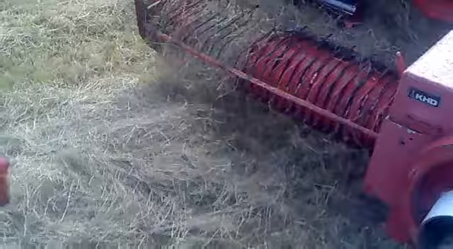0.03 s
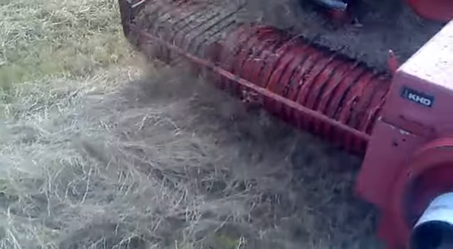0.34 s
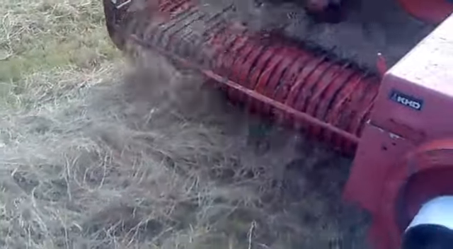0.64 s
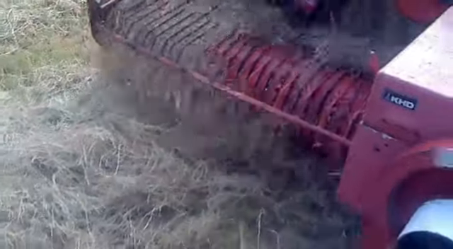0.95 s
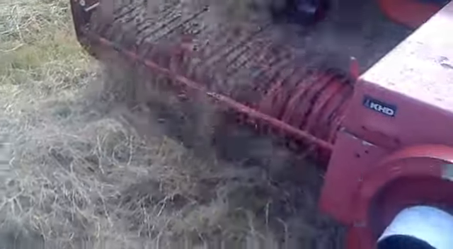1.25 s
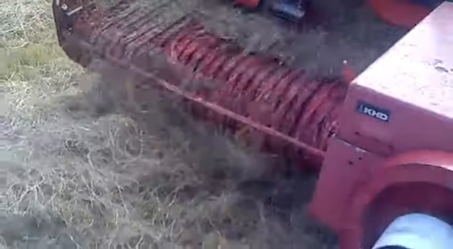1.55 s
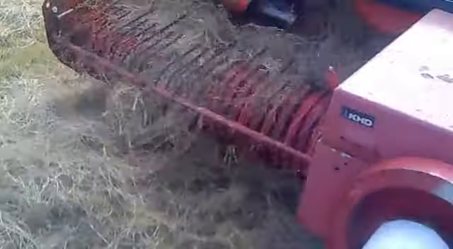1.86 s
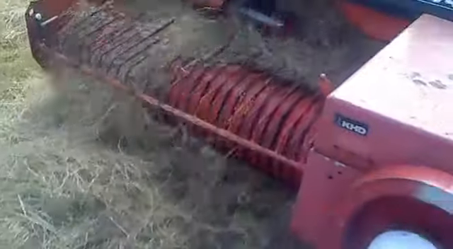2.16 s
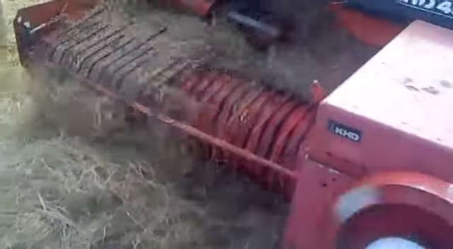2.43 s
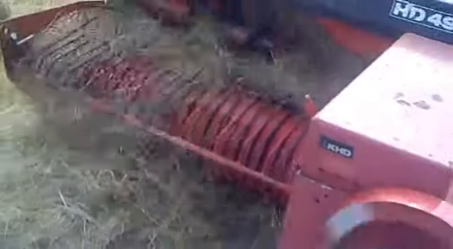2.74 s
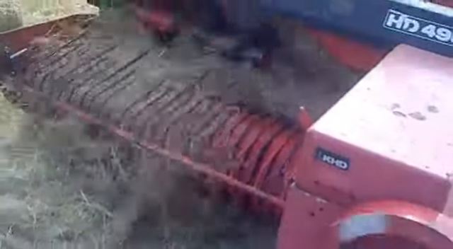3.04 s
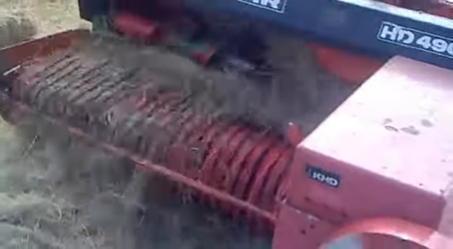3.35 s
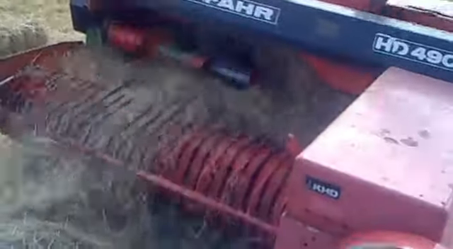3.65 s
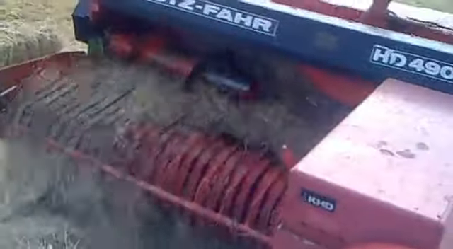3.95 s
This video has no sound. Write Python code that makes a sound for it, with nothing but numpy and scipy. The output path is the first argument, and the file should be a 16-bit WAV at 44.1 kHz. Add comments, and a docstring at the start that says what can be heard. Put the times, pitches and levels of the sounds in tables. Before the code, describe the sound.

Loud metallic rattling of a working hay baler, with regular booming strokes over an engine drone.

```python
"""Tractor and hay baler, beside the pickup reel.

The engine drones and a panel hums; chains and spring tines clatter and ring on sheet metal.
Each plunger stroke swells the clatter and booms in the bale chamber. Loose parts clank;
dry hay rustles over the reel and crunches in the feeder. The sound cuts in after one short blip."""
import sys
import numpy as np
from scipy import signal
from scipy.fft import rfft, irfft
from scipy.io import wavfile
from scipy.ndimage import uniform_filter1d

SR = 44100
rng = np.random.default_rng(int(sys.argv[2]) if len(sys.argv) > 2 else 0)


def pcm_store(signal):
    """Save signal as 16-bit PCM."""
    levels = np.round(np.clip(np.atleast_2d(signal), -1, 1) * 32767)
    wavfile.write(sys.argv[1], SR, levels.astype(np.int16).T)


N = 176400

# exhaust orders: multiple, level_db
ENGINE_ORDERS = [(1, -15), (2, 4), (3, -5), (3.5, -7)]
# plunger strokes: peak_s, clatter_db, boom_db
PLUNGER_STROKES = [(0.386, -2, 0.5), (1.118, -3, -5), (1.8, -4, 0.5), (2.46, -4.5, -5), (3.14, -3, -1.5),
                   (3.82, -3, -4)]
# bale chamber resonances: pitch_hz, width_hz, level_db
CHAMBER_MODES = [(117.4, 27, -1.5), (164.5, 17.4, -1.5), (220.6, 88, -2), (291.4, 43, 3.5), (327, 40, -3.5),
                 (381.9, 18, -1.5), (438, 59, -0.5), (539.3, 67, -0.5)]
# heavy thuds in the chamber: start_s, level_db
CHAMBER_THUDS = [(.315, -1), (.385, 0), (.45, 0), (1.034, 2), (1.141, 3.5), (1.295, 2), (1.832, -2),
                 (2.045, 0.5), (2.39, -5), (3.123, 1), (3.155, -0.5), (3.33, -2), (3.755, 1), (3.828, 3.5),
                 (3.905, 1)]
# hollow knocks of the chamber wall: start_s, pitch_hz, level_db
WALL_KNOCKS = [(1.139, 324, -25), (1.754, 300, -24.5), (2.04, 270, -33), (2.095, 276, -29.5),
               (2.765, 296, -34), (3.14, 418.6, -26.5), (3.421, 300.4, -28.5), (3.755, 268, -27)]
# panel hum swelling under load: start_s, hold_s, pitch_hz, level_db
PANEL_SWELLS = [(0.306, 0.13, 122, -39), (1.017, 0.21, 104.8, -33), (1.817, 0.13, 118, -33),
                (1.98, .05, 100, -28), (2.28, 0.094, 100.3, -34), (3.03, 0.055, 113.5, -32),
                (3.088, 0.055, 94.2, -31), (3.825, 0.077, 96.3, -39)]
# sheet metal spectrum: freq_hz, density_db
METAL_SPECTRUM = [(25, -21), (70, -14), (100, -4), (250, -2.5), (500, -2.5), (750, -2.5), (1060, -1),
                  (1170, 1), (1350, -1), (1500, 1), (1650, -2.5), (1950, -1), (2200, -4), (2550, -16),
                  (3100, -16.5), (3800, -21.5), (5300, -24), (5900, -26.5), (6600, -39.5), (8500, -35.5),
                  (15000, -54.5)]
# modes of tines and guards: pitch_hz, width_hz, level_db
TINE_RESONANCES = [(842, 22, -1.5), (1257, 100, -5), (1402, 64, -1), (1517, 48, 1.5), (1794, 39, 0.5),
                   (1913, 99, 4.5), (3020, 85, -12.5), (3540, 26, -22.5), (4850, 83, -18), (5240, 70, -16)]
# single tines ringing out: start_s, pitch_hz, level_db, hold_s
TINE_PINGS = [(.39, 1416, -27, .012), (.672, 1532, -29, 0.011), (1.085, 1280, -31, 0.0094),
              (1.839, 1575, -27.5, .012), (2.259, 1233, -25, .012), (2.436, 1480, -28, .01),
              (2.513, 1465, -22, .008), (2.937, 1434, -26, .012), (2.96, 1400, -26, .012),
              (3.24, 3450, -45, 0.032), (3.304, 1400, -25, 0.017), (3.396, 1895, -29.5, .01),
              (3.727, 5480, -39.5, 0.038)]
# hay flow through the pickup: time_s, level_db
HAY_FLOW = [(.26, -64), (.41, -35.5), (.48, -43), (.64, -33), (.72, -46), (.77, -39), (.81, -54),
            (.89, -49), (.96, -40.5), (1.06, -43), (1.26, -44), (1.35, -35), (1.42, -46), (1.48, -63),
            (1.54, -47), (1.64, -43), (1.75, -36.5), (1.9, -43.5), (2.06, -38.5), (2.14, -44),
            (2.27, -49.5), (2.5, -48.5), (2.65, -41.5), (2.75, -41.5), (2.805, -34), (2.85, -55),
            (2.91, -49), (2.98, -43), (3.15, -38.5), (3.26, -41.5), (3.52, -40.5), (3.575, -60),
            (3.62, -42), (3.67, -48), (3.8, -45), (4, -43)]
# dry hay spectrum: freq_hz, density_db
HAY_SPECTRUM = [(400, 6), (1800, 10.5), (3000, 9), (3900, 3.5), (5300, 8), (6600, -10), (8600, -19),
                (11000, -13), (15500, -23)]
# wads being crushed: start_s, hold_s, level_db, crackle_db
HAY_WADS = [(0.285, 0.051, -45, -18), (0.403, 0.023, -45, -12), (0.579, 0.099, -37, -12),
            (1.005, 0.025, -38.5, -9), (1.065, 0.0092, -39, -16), (1.14, 0.0088, -40.5, -14),
            (1.193, 0.01, -48, -8), (1.295, 0.027, -39.5, -13), (1.34, .02, -53, -8),
            (1.832, 0.0086, -50, -10), (1.921, 0.013, -45, -14), (1.985, 0.074, -44.5, -14),
            (2.066, 0.017, -38, -14), (2.641, 0.012, -46, -8), (2.69, .012, -46, -14),
            (2.778, .025, -48, -4), (3.033, 0.015, -43, -11), (3.074, .02, -47, -12),
            (3.132, 0.018, -45.5, -14), (3.178, 0.0099, -43, -15), (3.35, 0.018, -45, -12),
            (3.463, 0.025, -40, -14), (3.502, 0.023, -38.5, -11), (3.724, 0.023, -42, -12),
            (3.753, 0.014, -34.5, -10), (3.807, 0.027, -45, -12), (3.89, .012, -49, -8)]
# crushed hay spectrum: freq_hz, density_db
CRUNCH_SPECTRUM = [(1000, -35), (3000, -5), (5300, 11.5), (6700, -3), (8000, 1), (9200, 0.5),
                   (11500, -13.5), (15500, -25)]
# brittle straw spectrum: freq_hz, density_db
STRAW_SPECTRUM = [(3000, -30), (7000, -6), (9500, -1), (12000, 0), (15500, -12)]
# wind spectrum: freq_hz, density_db
WIND_SPECTRUM = [(15, -15), (32, -11), (65, 4), (200, -19), (1000, -44.5)]
# loose parts striking: start_s, level_db
PART_CLANKS = [(.314, -5), (0.392, -1.5), (0.496, -4), (0.673, -1), (0.842, -5), (0.97, -9), (1.045, -7),
               (1.084, -7), (1.144, -9), (1.214, -6), (1.297, -19), (1.712, -2.5), (1.767, -4),
               (1.837, 0.5), (1.978, -4), (2.01, -10), (2.075, -8), (2.316, -3.5), (2.436, -2),
               (2.51, -1.5), (2.625, -8.5), (2.945, -9.5), (3.032, -8), (3.127, -0.5), (3.149, -5),
               (3.304, -15), (3.395, -8), (3.45, -7.5), (3.622, -6), (3.815, 1), (3.899, -3.5), (3.979, -5)]
# metal scrape spectrum: freq_hz, density_db
SCRAPE_SPECTRUM = [(500, -20), (1900, 5), (3000, -4), (3900, -2), (5300, 4), (6700, -8), (8800, -12),
                   (15500, -25)]
# dry stalks breaking: start_s, pitch_hz, level_db
STALK_SNAPS = [(1.009, 8300, -32.5), (1.147, 9100, -48), (1.2, 8850, -42.5), (1.975, 9100, -40),
               (2.614, 10400, -48), (2.969, 5560, -40.5), (3.042, 8200, -44), (3.084, 8500, -47),
               (3.476, 9100, -45), (3.506, 8760, -38), (3.757, 10800, -37.5), (3.898, 5400, -37)]

ENGINE_HZ, ENGINE_DB = 46.3, -37.5
STROKE_RISE_S, STROKE_FALL_S = 0.18, 0.089
FORK_DELAY_S, FORK_WIDTH_S, FORK_SHARE = 0.23, 0.074, 0.48
RUMBLE_DB, BOOM_DB, THUD_DB = -37.5, -29, -29
PANEL_HZ, PANEL_DB = 106.5, -44
CLATTER_DB, SURGE_DB = -28.5, -21.5
TINE_BAR_HZ, TINE_BAR_PEAK_S, TINE_BAR_DEPTH = 16.21, 0.2897, 0.071
JINGLE_DB, BUZZ_DEPTH_DB = -38, 2.5
PRONG_SPLIT_HZ, LOWER_PRONG_DB = 81, -10.5
PATCH_DEPTH_DB, CLUMP_DEPTH_DB, TICK_REL_DB = 2.7, 2, -11
WIND_DB, GUST_DEPTH_DB = -67.5, 1
CLANK_DB, SCRAPE_DB = -23, -42.5
BLIP_START_S, BLIP_END_S, BLIP_GAIN_DB = 0.0972, 0.1017, 2
CUT_IN_S, LOWPASS_HZ = 0.262, 15750


def undb(db):
    """Decibels to gain."""
    return 10 ** (np.asarray(db) / 20)


def unit(x):
    """Scale to rms 1."""
    return x / np.sqrt(np.mean(x ** 2))


def drift(rate_hz):
    """Smooth random drift, spread near 1."""
    span = int(SR / rate_hz)
    steps = np.repeat(rng.standard_normal(N)[:N // span + 1], span)
    return 1.3 * uniform_filter1d(uniform_filter1d(steps, span), span)[:N]


def colour(x, spectrum):
    """Filter by (freq_hz, density_db) points; rms 1."""
    hz, db = np.array(spectrum).T
    bins_hz = np.arange(N // 2 + 1) * SR / N
    gain = undb(np.interp(np.log(bins_hz + 1), np.log(hz), db))
    return unit(irfft(rfft(x) * gain, N))


def resonate(x, hz, width_hz):
    """Resonance with steep skirts; rms 1."""
    b, a = signal.iirpeak(hz, hz / width_hz, fs=SR)
    return unit(signal.lfilter(b, a, signal.lfilter(b, a, x)))


def impacts(per_s, scatter_db):
    """Random clicks of scattered strength."""
    hits = rng.random(N) < per_s / SR
    strength = undb(scatter_db * np.clip(rng.standard_normal(N), -2.5, 2.5))
    return hits * rng.choice([-1, 1], N) * strength


def struck_modes(modes, per_s, scatter_db):
    """Resonances, each driven by its own impacts; rms 1."""
    return unit(sum(undb(db) * resonate(impacts(per_s, scatter_db), hz, width_hz)
                    for hz, width_hz, db in modes))


def rattle(per_s, scatter_db, t60_s, parts):
    """Impacts shared among parts, each with its own dense, short ring."""
    age_s = np.arange(SR // 5) / SR
    fade = np.exp(-np.log(1000) * age_s / t60_s)
    total = np.zeros(N)
    for _ in range(parts):
        hits = impacts(per_s / parts, scatter_db)
        ring = fade * rng.standard_normal(len(age_s))
        total += signal.fftconvolve(hits, ring)[:N]
    return total


def burst(t, start_s, attack_s, hold_s, fade_s):
    """Linear attack; exponential fade from hold_s after the start."""
    attack = np.clip((t - start_s) / attack_s, 0, 1)
    return attack * np.exp(-np.maximum(t - start_s - hold_s, 0) / fade_s)


def engine():
    """Low exhaust orders at governed speed; firings vary in strength."""
    firing_hz = ENGINE_HZ * (1 + 0.0034 * drift(rate_hz=3.7))
    phase = 2 * np.pi * np.cumsum(firing_hz) / SR
    exhaust = np.zeros(N)
    for multiple, db in ENGINE_ORDERS:
        flutter_db = 1.5 * drift(rate_hz=16)
        exhaust += undb(db - flutter_db) * np.sin(multiple * phase + 2 * np.pi * rng.random())
    sway_db = 0.5 * drift(rate_hz=22)
    return undb(ENGINE_DB) * unit(exhaust * undb(sway_db))


def plunger_load(t, peak_s):
    """Force of one stroke and the weaker feeder fork swing after it."""
    age_s = t - peak_s
    push = np.exp(np.minimum(age_s / STROKE_RISE_S, -age_s / STROKE_FALL_S))
    fork = np.exp(-0.5 * ((age_s - FORK_DELAY_S) / FORK_WIDTH_S) ** 2)
    return push + FORK_SHARE * fork


def chamber(t):
    """The bale chamber rumbles, booms at each stroke, thuds and knocks as hay is rammed in."""
    body = struck_modes(CHAMBER_MODES, per_s=2500, scatter_db=1.5)
    force = sum(undb(db) * plunger_load(t, at) for at, _, db in PLUNGER_STROKES)
    thuds = sum(undb(db) * burst(t, at, attack_s=0.0064, hold_s=0.02, fade_s=0.032)
                for at, db in CHAMBER_THUDS)
    power = undb(RUMBLE_DB) ** 2 + (undb(BOOM_DB) * force) ** 2 + (undb(THUD_DB) * thuds) ** 2
    knocks = np.zeros(N)
    for at, hz, db in WALL_KNOCKS:
        envelope = burst(t, at, attack_s=0.008, hold_s=0.023, fade_s=0.018)
        knocks += undb(db) * envelope * np.sin(2 * np.pi * hz * (t - at))
    return body * np.sqrt(power) + knocks


def panel(t):
    """A large panel hums unsteadily and swells at shifting pitches under load."""
    phase_per_hz = 2 * np.pi * np.cumsum(1 + 0.0402 * drift(rate_hz=16)) / SR
    hum = undb(PANEL_DB) * unit(np.sin(PANEL_HZ * phase_per_hz))
    for at, hold_s, hz, db in PANEL_SWELLS:
        envelope = burst(t, at, attack_s=0.032, hold_s=hold_s, fade_s=0.018)
        hum += undb(db) * envelope * np.sqrt(2) * np.sin(hz * phase_per_hz)
    return hum


def clatter(t):
    """Chains and tines rattle sheet metal, pulsing with the tine bars, surging under load."""
    metal = colour(rattle(per_s=1800, scatter_db=3, t60_s=0.053, parts=8), METAL_SPECTRUM)
    force = sum(undb(db) * plunger_load(t, at) for at, db, _ in PLUNGER_STROKES)
    pulse = 1 + TINE_BAR_DEPTH * np.cos(2 * np.pi * TINE_BAR_HZ * (t - TINE_BAR_PEAK_S))
    return metal * pulse * np.hypot(undb(CLATTER_DB), undb(SURGE_DB) * force)


def prongs(age_s, hz):
    """The two prongs of a tine, slightly out of tune, beat."""
    upper = np.sin(2 * np.pi * (hz + PRONG_SPLIT_HZ / 2) * age_s)
    lower = np.sin(2 * np.pi * (hz - PRONG_SPLIT_HZ / 2) * age_s)
    return upper + undb(LOWER_PRONG_DB) * lower


def tines(t):
    """Spring tines flick their guards and ring; a few ring louder, buzzing against the guard."""
    jingle = struck_modes(TINE_RESONANCES, per_s=140, scatter_db=2)
    wobble_s = np.cumsum(0.0069 * drift(rate_hz=220)) / SR
    pings = np.zeros(N)
    for at, hz, db, hold_s in TINE_PINGS:
        envelope = burst(t, at, attack_s=0.0044, hold_s=hold_s, fade_s=0.012)
        pings += undb(db) * envelope * prongs(t - at + wobble_s, hz)
    buzz = undb(BUZZ_DEPTH_DB * drift(rate_hz=220))
    return undb(JINGLE_DB) * jingle + pings * buzz


def hay_rustle(t):
    """Dry stalks rustle and tick over the reel in uneven clumps."""
    flow_db = np.interp(t, *np.array(HAY_FLOW).T)
    uneven_db = PATCH_DEPTH_DB * drift(rate_hz=35) + CLUMP_DEPTH_DB * drift(rate_hz=70)
    rustle = colour(rattle(per_s=5000, scatter_db=3, t60_s=0.0076, parts=5), HAY_SPECTRUM)
    ticks = colour(rattle(per_s=160, scatter_db=1, t60_s=0.053, parts=6), CRUNCH_SPECTRUM)
    return undb(flow_db + uneven_db) * (rustle + undb(TICK_REL_DB) * ticks)


def wind():
    """Faint, low buffeting."""
    level_db = WIND_DB + GUST_DEPTH_DB * drift(rate_hz=5)
    return undb(level_db) * colour(rng.standard_normal(N), WIND_SPECTRUM)


def hay_crunch(t):
    """The feeder crushes wads of hay; brittle straw crackles."""
    crush = colour(rattle(per_s=2700, scatter_db=1, t60_s=0.019, parts=3), CRUNCH_SPECTRUM)
    crackle = colour(rattle(per_s=1200, scatter_db=2, t60_s=0.01, parts=3), STRAW_SPECTRUM)
    wads = np.zeros(N)
    for at, hold_s, db, crackle_db in HAY_WADS:
        envelope = burst(t, at, attack_s=0.005, hold_s=hold_s, fade_s=0.014)
        wads += undb(db) * envelope * (crush + undb(crackle_db) * crackle)
    return wads


def clanks(t):
    """Loose parts hit sheet metal and chatter, with a shorter, bright scrape at contact."""
    blows = sum(undb(db) * burst(t, at, attack_s=0.0032, hold_s=0.0093, fade_s=0.021)
                for at, db in PART_CLANKS)
    contact = sum(undb(db) * burst(t, at, attack_s=0.0024, hold_s=0.01, fade_s=0.0089)
                  for at, db in PART_CLANKS)
    chatter = rattle(per_s=3000, scatter_db=1, t60_s=0.026, parts=4)
    metal = undb(CLANK_DB) * blows * colour(chatter, METAL_SPECTRUM)
    scrape = undb(SCRAPE_DB) * contact * colour(chatter, SCRAPE_SPECTRUM)
    return metal + scrape


def snaps(t):
    """Single stalks break with a short, pitched crack."""
    fibres = rng.standard_normal(N)
    cracks = np.zeros(N)
    for at, hz, db in STALK_SNAPS:
        envelope = burst(t, at, attack_s=0.0013, hold_s=0.0015, fade_s=0.0072)
        cracks += undb(db) * envelope * resonate(fibres, hz, width_hz=0.16 * hz)
    return cracks


def scene():
    """Tractor and baler, close by in the open; mono."""
    t = np.arange(N) / SR
    machine = engine() + chamber(t) + panel(t) + clatter(t) + tines(t)
    return (machine + hay_rustle(t) + wind() + hay_crunch(t) + clanks(t) + snaps(t))[None]


def record(dry):
    """Muted but for one blip until the cut-in; steep low-pass."""
    t = np.arange(N) / SR
    blip = undb(BLIP_GAIN_DB) * ((t > BLIP_START_S) & (t < BLIP_END_S))
    gate = uniform_filter1d(blip + (t > CUT_IN_S), size=60)
    lowpass = signal.ellip(10, 0.2, 80, LOWPASS_HZ, fs=SR, output="sos")
    return signal.sosfilt(lowpass, dry * gate)


dry = scene()
out = record(dry)
pcm_store(out)
```